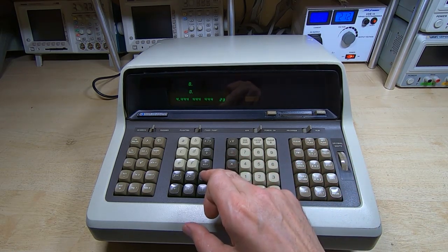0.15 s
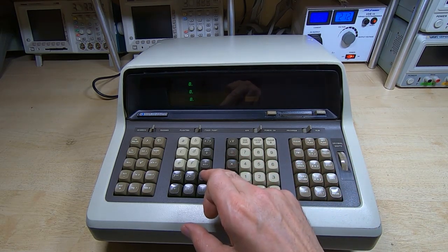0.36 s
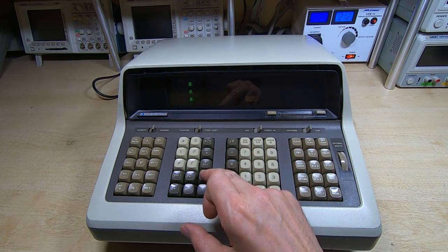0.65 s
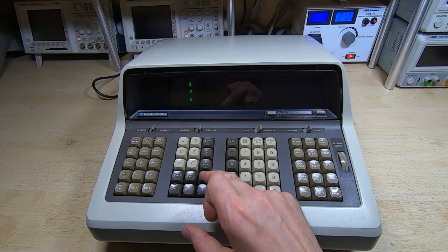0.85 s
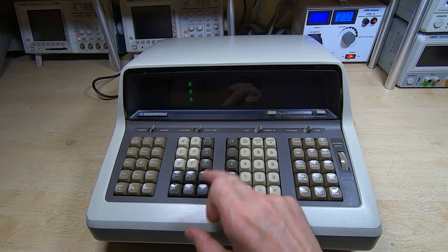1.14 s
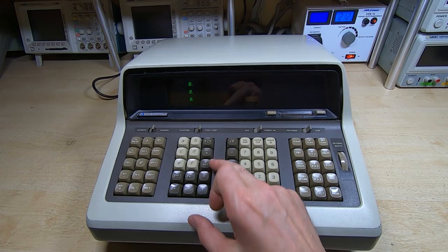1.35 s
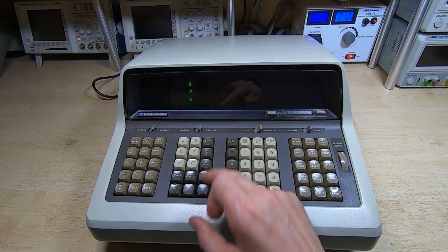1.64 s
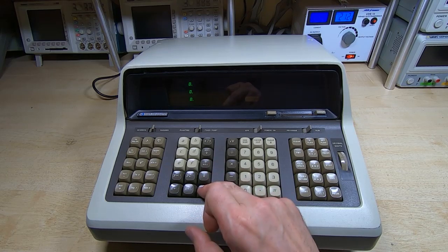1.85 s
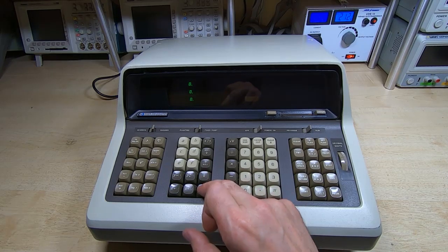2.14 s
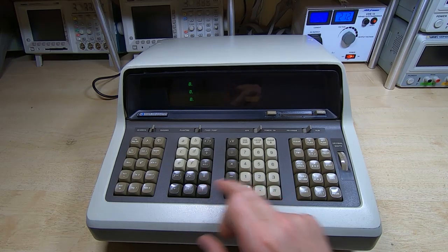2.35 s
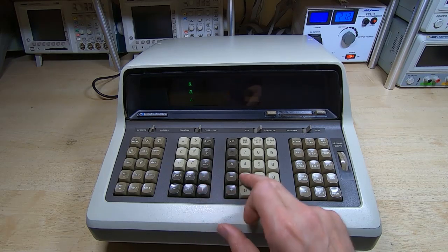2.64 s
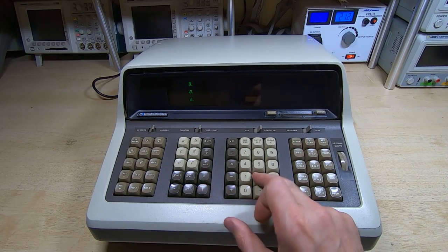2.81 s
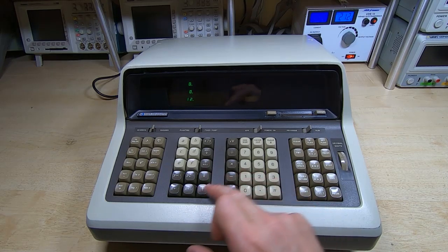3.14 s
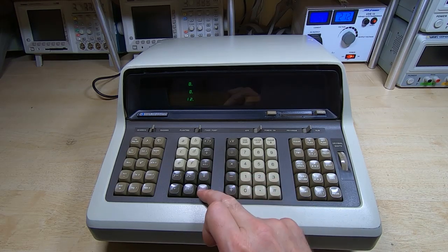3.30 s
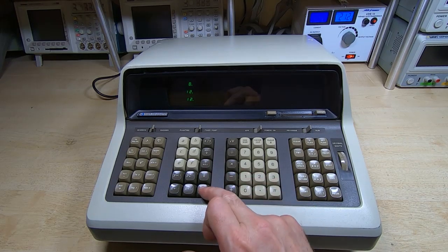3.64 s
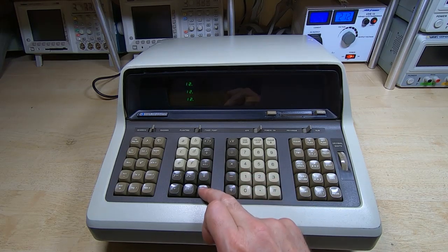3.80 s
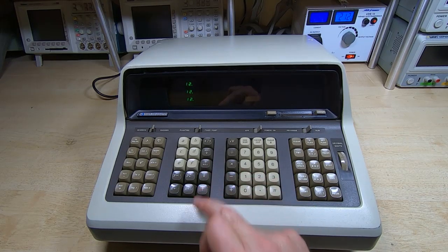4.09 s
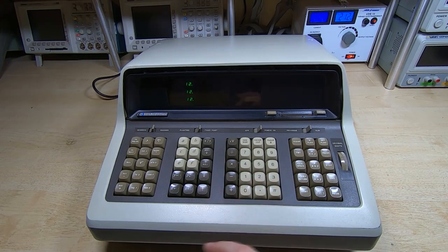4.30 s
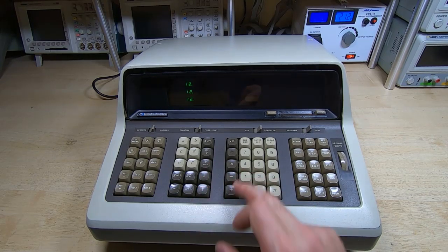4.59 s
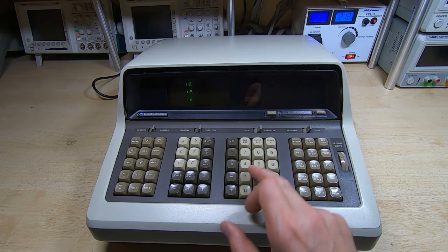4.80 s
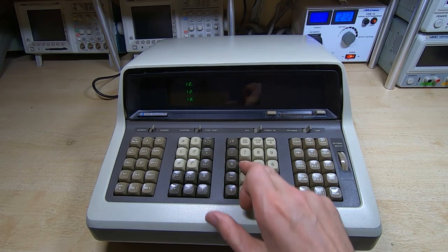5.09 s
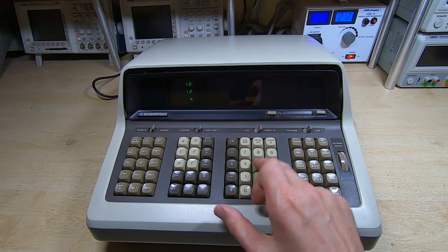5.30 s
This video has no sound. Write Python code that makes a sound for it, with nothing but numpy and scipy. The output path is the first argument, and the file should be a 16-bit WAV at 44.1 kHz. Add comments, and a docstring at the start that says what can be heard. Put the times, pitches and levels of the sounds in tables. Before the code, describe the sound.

One finger presses old calculator keys in short bursts, each snapping down and thudding back up, over a steady low electrical hum.

```python
"""A wooden workbench in a small room: one finger keys four short runs into an old desktop calculator.
Each stroke is a light touch on the cap, the snap of the switch, a rattle as the key rises and a thud
at its stop. The hollow housing rings with every blow. Mains hum and a faint fan fill the room;
before the last run the hand taps once and a sleeve rustles."""
import sys
import numpy as np
from scipy import signal
from scipy.fft import rfft, irfft
from scipy.io import wavfile

SR = 44100
rng = np.random.default_rng(int(sys.argv[2]) if len(sys.argv) > 2 else 0)


def int16_out(signal):
    """Quantize to a 16-bit WAV file."""
    q = np.round(np.clip(np.atleast_2d(signal).T, -1, 1) * 32767)
    wavfile.write(sys.argv[1], SR, q.astype(np.int16))


N = 240462
T = np.arange(SR // 3) / SR  # time axis of one blow [s]

# key down: (snap time [s], force [dB], touch to snap [s], landing hardness [dB])
PRESSES = [(0.266, -31, 0.042, -24), (0.5094, -30.5, 0.032, -24), (0.7716, -30, 0.034, -8.5),
           (1.8457, -25.5, 0.029, -17), (2.1011, -24, 0.031, -18.5), (2.638, -24.5, .024, -7),
           (2.835, -25, 0.026, -11.5), (3.6019, -27, .036, -16.5), (3.8165, -27, 0.044, -15.5),
           (5.1362, -25.5, 0.023, -9.5), (5.3836, -25.5, .0245, -7)]
# key up: (stop time [s], force [dB], rise time [s], stop hardness [dB])
RELEASES = [(0.359, -19, 0.013, -4), (0.605, -18, 0.0084, -4.5), (0.889, -19.5, .011, -3.5),
            (1.958, -14.5, 0.0099, -0.5), (2.186, -10.5, 0.0073, 0), (2.722, -15, .012, 2.5),
            (2.938, -16, 0.012, 7), (3.442, -23.5, 0, -5.5), (3.7, -18, .013, 1.5),
            (3.904, -16.5, 0.013, 0), (5.233, -15, 0.012, -0.5)]
# modes of keyboard plate, housing and key caps: (frequency [Hz], level [dB], t60 [s])
PLATE_MODES = [(367, -8, .24), (420, -5, .14), (448, -1, .34), (495, -1, .34), (528, -2, .26),
               (560, -5, .14), (613, -8, .22), (690, -9, .1)]
HOUSING_MODES = [(742, -3, .12), (980, 0, .16), (1020, -2, .11), (1103, -2, .13), (1180, -3, .18),
                 (1250, -4, .18), (1297, -3, .14), (1400, -4, .13), (1539, -10, .14), (1695, -9, .13),
                 (1860, -7, .17)]
CAP_MODES = [(2400, 0, .19), (2519, -2, .16), (2575, -3, .14), (2713, -2, .13), (2860, 1, .18),
             (2960, 1, .18), (3149, -1, .14), (3390, -6, .13)]
# spectra of housing clack, cap rattle, stretching spring, singing coil: (frequency [Hz], level [dB])
CLACK = [(300, -39.5), (620, 2), (780, -6.5), (1350, -0.5), (1550, -9), (1900, -10.5), (2500, -24),
         (6000, -57)]
RATTLE = [(600, -8), (1900, -7.5), (2450, -1), (2900, 0), (3500, -5), (4100, -10), (4800, -15),
          (7500, -18.5), (12000, -25.5)]
SPRING_UP = [(3000, -23), (7000, -48.5), (9500, -38), (10500, -2), (12700, -4), (13600, 3), (14300, 6),
             (15000, -4), (16000, -23)]
COIL = [(9000, -49), (13200, -23), (13900, -11), (14300, 6), (14800, 2), (15600, -18)]
HOLLOW_HZ, PAD_HOLLOW_DB = 796, 10  # hollow note of the housing, its boost under the number pad


def amp(db):
    """Decibels to gain."""
    return 10 ** (np.asarray(db) / 20)


def lookup(points, hz):
    """Table value, interpolated over log frequency."""
    table_hz, value = np.transpose(points)
    return np.interp(np.log(hz + 1), np.log(table_hz + 1), value)


def add(mix, at_s, sound):
    """Mixes a sound in at at_s."""
    part = mix[round(at_s * SR):][:len(sound)]
    part += sound[:len(part)]


def unit(x):
    """Scales a blow to the energy of 10 ms at full level."""
    return x / np.sqrt(np.sum(x ** 2) / (SR / 100) + 1e-20)


def colour(x, spectrum):
    """Minimum-phase filter with the given spectrum."""
    log_gain = np.log(amp(lookup(spectrum, abs(np.fft.fftfreq(4096, 1 / SR)))))
    taps = np.fft.ifft(np.exp(np.conj(signal.hilbert(log_gain)))).real
    return signal.fftconvolve(x, taps[:len(taps) // 2])[:len(x)]


def noise(spectrum):
    """Steady coloured noise, rms 1."""
    gain = amp(lookup(spectrum, np.fft.rfftfreq(N, 1 / SR)))
    x = irfft(rfft(rng.standard_normal(N)) * gain, N)
    return x / x.std()


def clatter(spectrum, crack_s, loose_db, t60_s):
    """A hard first contact, then loose parts chatter and die away."""
    envelope = np.exp(-T / crack_s) + amp(loose_db - 60 * T / t60_s)
    return unit(colour(rng.standard_normal(len(T)) * envelope, spectrum))


def ring(modes, spread_db=4.5, rise_s=0.0018):
    """Decaying modes; each blow lands elsewhere and shares out its force differently."""
    hz, db, t60_s = np.transpose(modes)[:, :, None]
    share_db = spread_db * rng.standard_normal(hz.shape)
    waves = amp(db + share_db - 60 * T / t60_s) * np.sin(2 * np.pi * (hz * T + rng.random(hz.shape)))
    return unit(waves.sum(0) * (1 - np.exp(-T / rise_s)))


def note(hz, t60_s, rise_s=0.0016):
    """One decaying mode."""
    envelope = amp(-60 * T / t60_s) * (1 - np.exp(-T / rise_s))
    return unit(envelope * np.sin(2 * np.pi * (hz * T + rng.random())))


def twang(hz, t60_s, split=0.018):
    """Three close, beating modes of a small part."""
    return ring([(hz * (1 + k * split), 0, t60_s) for k in (-1, 0, 1)], spread_db=3, rise_s=0.001)


def pulse(hz, peak_s, order=3):
    """A heavily damped resonance: swells for a few cycles and stops."""
    return unit((T / peak_s * np.exp(1 - T / peak_s)) ** order * np.sin(2 * np.pi * hz * T))


def key_at(at_s):
    """Voice of the key under the finger."""
    # (from [s], snap [Hz], panel note [Hz], spring [Hz], thud [Hz], cap note [Hz],
    #  cap [dB], spring [dB], coil [dB], block [0 left, 1 number pad])
    voices = [(0.1, 3024, 1321, 13800, 459, 2954, 1.5, 2, -2, 0),
              (1.7, 2860, 1400, 9740, 475, 2786, -0.5, -0.5, -2, 0),
              (2.5, 2910, 1380, 13700, 451, 2780, -2.5, -1.5, 5, 1),
              (2.79, 2660, 977, 12200, 493, 3480, 0, -15.5, 4, 1),
              (3.2, 2860, 1281, 9800, 497, 2885, 1, 1.5, -2, 0),
              (5.0, 3140, 1380, 12300, 471, 3600, -7, -4, 1, 1),
              (5.32, 2960, 1380, 10700, 480, 3000, -3, -3.5, -9, 1)]
    names = "snap_hz panel_hz spring_hz thud_hz cap_hz cap_db spring_db coil_db on_pad".split()
    started = [voice for from_s, *voice in voices if from_s <= at_s]
    return dict(zip(names, started[-1]))


def mains_and_fan(waver=0.073):
    """Wavering transformer and fan tones over moving air and low rumble."""
    # mains and fan tones: (frequency [Hz], rms level [dB])
    tones = [(50, -41), (100, -65.5), (150, -56), (250, -66.5), (528.5, -64.5)]
    # spectra of fan air and room rumble: (frequency [Hz], level [dB])
    air = [(41, -39), (70, -0.5), (77, -3.5), (151, -6), (177, -8.5), (249, -9), (492, -12), (527, -7.5),
           (564, -12.5), (2410, -23.5), (3020, -24.5), (5960, -27), (15800, -31)]
    rumble = [(5, 2), (14, -3.5), (25, -3.5), (34, -3.5), (42, -4), (60, -9.5), (90, -24), (200, -82)]
    t = np.arange(N) / SR
    knots_s = np.linspace(0, t[-1], 30)
    out = amp(-46) * noise(air) + amp(-42.5) * noise(rumble)
    for hz, db in tones:
        sway = 1 + waver * np.interp(t, knots_s, rng.standard_normal(len(knots_s)))
        out += np.sqrt(2) * amp(db) * sway * np.sin(2 * np.pi * (hz * t + rng.random()))
    return out


def room(x, delay_s=0.007, wall_s=0.0096, wall_db=-5):
    """One wall echo plus scatter from shelves; the treble dies first."""
    # room decay: (frequency [Hz], t60 [s])
    decay = [(300, 0.35), (790, 0.36), (2100, 0.33), (5500, 0.27), (14600, 0.25)]
    hz, t, bins = signal.stft(rng.standard_normal(SR // 2), SR, nperseg=256)
    tail = signal.istft(bins * amp(-60 * t / lookup(decay, hz)[:, None]), SR)[1]
    response = np.concatenate([np.zeros(round(delay_s * SR)), tail / np.linalg.norm(tail)])
    response[round(wall_s * SR)] += amp(wall_db)
    return signal.fftconvolve(x, response)[:N]


def sleeve(at_s=4.69, width_s=0.09, level_db=-51):
    """Faint rustle as the arm returns to the keys."""
    # cloth spectrum: (frequency [Hz], level [dB])
    cloth = [(200, -2), (500, 4), (1000, -2), (1800, -8), (2450, 0), (3000, -14), (8000, -22)]
    return amp(level_db) * noise(cloth) * np.exp(-((np.arange(N) / SR - at_s) / width_s) ** 2)


def hand_tap(at_s=4.361, level_db=-43):
    """One small tap as the hand leaves the machine."""
    out = np.zeros(N)
    tick = amp(-10) * clatter(RATTLE, crack_s=0.002, loose_db=-15, t60_s=0.06)
    body = note(hz=1213, t60_s=0.076) + amp(-7) * note(hz=1020, t60_s=0.065)
    add(out, at_s, amp(level_db) * (body + tick))
    return out


def nudge(rise_s=0.0019):
    """A soft fingertip jogs the housing."""
    knock = clatter(CLACK, crack_s=0.0079, loose_db=3, t60_s=0.31)
    knock += amp(-6) * ring(HOUSING_MODES) + amp(-8.5) * ring(PLATE_MODES)
    knock += amp(-3.5) * note(hz=1372, t60_s=0.043)
    return knock * (1 - np.exp(-T / rise_s))


def key_touches(pad_db=-4, settle_s=3.337):
    """Before each snap the fingertip nudges the housing and wobbles the cap."""
    out = np.zeros(N)
    for at_s, force_db, lead_s, landing_db in PRESSES:
        wobble = clatter(RATTLE, crack_s=0.005, loose_db=-1, t60_s=0.32) * (1 - np.exp(-T / 0.0012))
        add(out, at_s - lead_s, amp(force_db - 10 + pad_db * key_at(at_s)["on_pad"]) * nudge())
        add(out, at_s - lead_s, amp(force_db + landing_db - 1) * wobble)
    add(out, settle_s, amp(-41) * nudge())  # finger settles on a key, no snap
    return out


def key_rises():
    """The spring hisses and lifts the key, which chatters in its guide and jogs the housing."""
    out = np.zeros(N)
    for stop_s, force_db, rise_s, hard_db in RELEASES:
        if rise_s > 0:  # a key barely down has no travel
            key = key_at(stop_s)
            rattle_db = 0.61 * force_db + 0.91 * (key["cap_db"] + min(hard_db, 0))
            chatter = clatter(RATTLE, crack_s=0.011, loose_db=-5, t60_s=0.15)
            rattle = amp(-24) * chatter + amp(-25.5) * ring(HOUSING_MODES)
            spring = amp(-44) * clatter(SPRING_UP, crack_s=0.0043, loose_db=-2, t60_s=0.12)
            add(out, stop_s - rise_s, amp(rattle_db) * rattle + amp(0.45 * key["spring_db"]) * spring)
    return out


def key_presses(travel_s=0.013, firm_db=-25, firm_lag_s=0.0014, lag_doubling_db=2.5):
    """The switch snaps: cap and spring first, then housing and plate; a tick as the key bottoms out."""
    # spectra of switch snap and compressed spring: (frequency [Hz], level [dB])
    snap = [(600, -32), (1900, -12), (2450, 2), (3050, 5.5), (3350, -7.5), (3800, -22), (4600, -20),
            (7500, -19.5), (12000, -66)]
    spring_down = [(3000, -63), (7000, -4.5), (8500, -0.5), (9500, -4), (9850, -6), (10300, 1.5),
                   (13200, 5), (14200, 7.5), (15000, -3), (16000, -18)]
    out = np.zeros(N)
    for at_s, force_db, _, landing_db in PRESSES:
        key = key_at(at_s)
        tuned_snap = [(hz * key["snap_hz"] / 2850, db) for hz, db in snap]
        cap = amp(-4) * pulse(key["snap_hz"], peak_s=0.00094)
        cap += amp(2.5) * clatter(tuned_snap, crack_s=0.0063, loose_db=-4, t60_s=0.17)
        cap += amp(-11.5) * ring(CAP_MODES)
        add(out, at_s, amp(force_db + key["cap_db"] - 4.5) * cap)

        spring = clatter(spring_down, crack_s=0.0017, loose_db=-2.5, t60_s=0.15)
        spring += amp(-7) * twang(key["spring_hz"], t60_s=0.09)
        spring += amp(key["coil_db"] - 6) * clatter(COIL, crack_s=0.004, loose_db=-3, t60_s=0.16)
        add(out, at_s, amp(force_db + key["spring_db"] - 8.5) * spring)

        lag_s = firm_lag_s * 2 ** ((firm_db - force_db) / lag_doubling_db)  # soft presses jolt later
        housing = ring(HOUSING_MODES) + amp(1.5) * clatter(CLACK, crack_s=0.018, loose_db=0, t60_s=0.15)
        housing += amp(-1.5) * note(key["panel_hz"], t60_s=0.16, rise_s=0.0031)
        housing += amp(PAD_HOLLOW_DB * key["on_pad"] - 8.5) * note(HOLLOW_HZ, t60_s=0.18)
        add(out, at_s + lag_s, amp(force_db - 5.5) * housing)

        guide_scrape = clatter(RATTLE, crack_s=0.0053, loose_db=-1, t60_s=0.15)
        add(out, at_s, amp(force_db + landing_db - 2.5) * guide_scrape)
        plate = ring(PLATE_MODES) + amp(2) * pulse(hz=508, peak_s=0.0034)
        add(out, at_s + lag_s, amp(force_db - 7) * plate)
        tick = clatter(spring_down, crack_s=0.0008, loose_db=-25, t60_s=0.04)
        add(out, at_s + travel_s, amp(force_db + key["spring_db"] - 32) * tick)
    return out


def key_stops(spread_s=0.0069, bounce_s=0.0055, cushioning=2.6):
    """The rising key thumps the plate, which rings low and hollow; the spring sings and bounces once."""
    # spectrum of the knock on the plate: (frequency [Hz], level [dB])
    knock = [(200, -48), (320, -40), (420, 2), (560, -8.5), (660, -8), (800, -6.5), (1100, -26),
             (2500, -69)]
    out = np.zeros(N)
    for at_s, force_db, rise_s, hard_db in RELEASES:
        key = key_at(at_s)
        slack_db = 0 if rise_s > 0 else -12  # key barely down: slack spring
        thud = pulse(key["thud_hz"], peak_s=0.0058, order=4)
        thud += amp(-9.5) * clatter(knock, crack_s=0.0038, loose_db=-11, t60_s=0.33)
        thud += amp(PAD_HOLLOW_DB * key["on_pad"] - 17.5) * note(HOLLOW_HZ, t60_s=0.15)
        add(out, at_s, amp(force_db - 8.5) * thud)

        housing = ring(HOUSING_MODES) + amp(3.5) * clatter(CLACK, crack_s=0.0092, loose_db=6, t60_s=0.1)
        housing += amp(-9.5) * note(key["panel_hz"], t60_s=0.18)
        cushion_db = cushioning * min(hard_db, 0)  # a soft stop spares the housing
        add(out, at_s, amp(force_db + cushion_db - 22.5) * housing)

        cap = clatter(RATTLE, crack_s=0.0013, loose_db=1, t60_s=0.14) + amp(-15.5) * ring(CAP_MODES)
        cap += amp(-4.5) * twang(key["cap_hz"], t60_s=0.084, split=0.05)
        add(out, at_s, amp(force_db + hard_db + slack_db / 4 - 20.5) * cap)

        spring_db = 0.63 * force_db + 0.6 * hard_db + 4 * key["on_pad"] + slack_db
        spring = clatter(SPRING_UP, crack_s=0.0017, loose_db=-6, t60_s=0.11)
        spring += amp(key["coil_db"]) * clatter(COIL, crack_s=0.006, loose_db=-3, t60_s=0.18)
        add(out, at_s, amp(spring_db - 44) * spring)

        add(out, at_s + spread_s, amp(force_db - 16) * ring(PLATE_MODES, rise_s=0.0029))
        bounce = clatter(SPRING_UP, crack_s=0.0008, loose_db=-20, t60_s=0.04)
        add(out, at_s + bounce_s, amp(spring_db - 47) * bounce)
    return out


def scene():
    """Keys, hand and hum, the same in both channels."""
    keys = key_touches() + key_presses() + key_rises() + key_stops() + hand_tap()
    mono = keys + amp(-12) * room(keys) + sleeve() + mains_and_fan()
    return np.array([mono, mono])


def record(dry):
    """Faint hiss per channel, then a 15.9 kHz low-pass."""
    hissy = dry + amp(-70.5) * rng.standard_normal(dry.shape)
    low_pass = signal.firwin(511, 15900, window=("kaiser", 9), fs=SR)
    return signal.oaconvolve(hissy, low_pass[None], "same")


dry = scene()
out = record(dry)
int16_out(out)
```